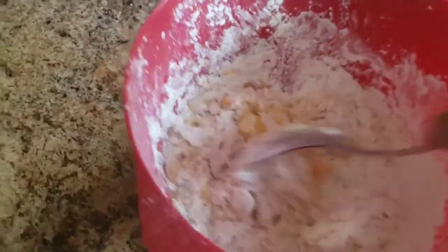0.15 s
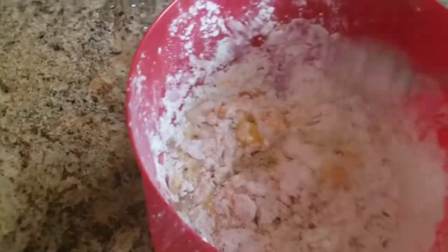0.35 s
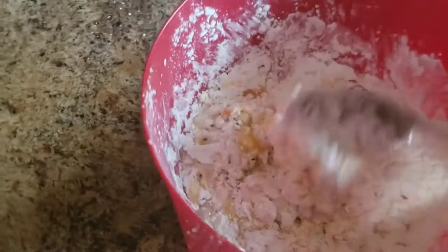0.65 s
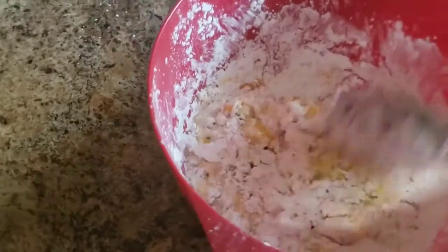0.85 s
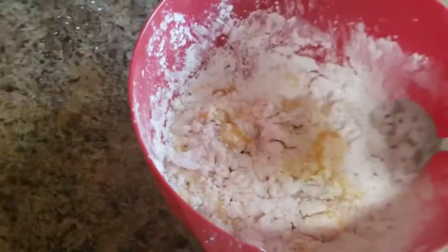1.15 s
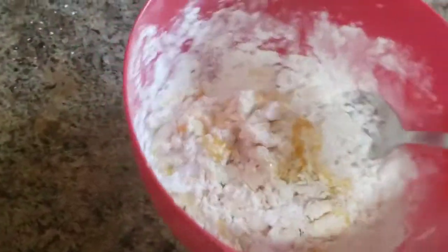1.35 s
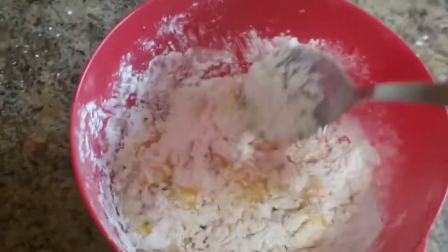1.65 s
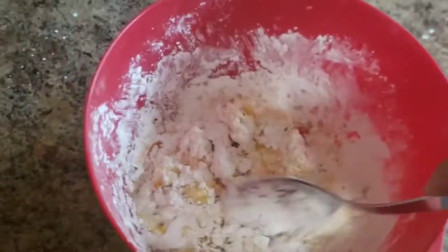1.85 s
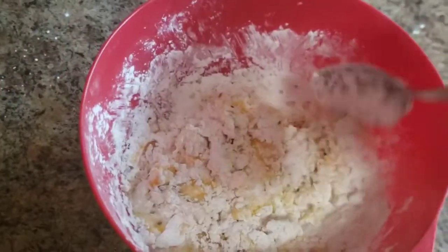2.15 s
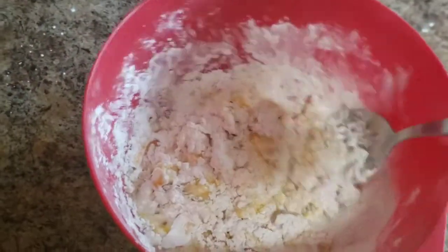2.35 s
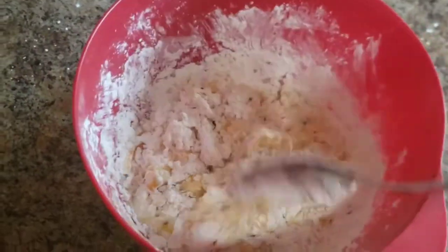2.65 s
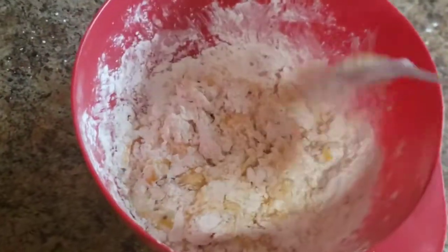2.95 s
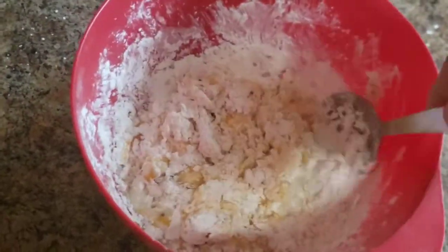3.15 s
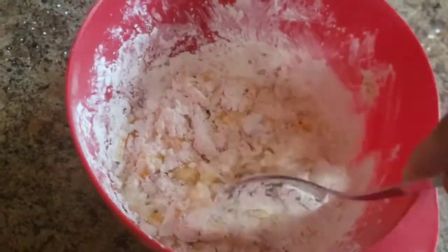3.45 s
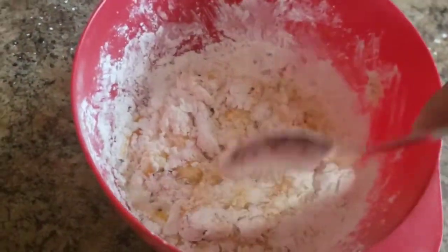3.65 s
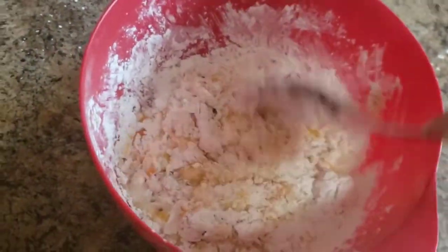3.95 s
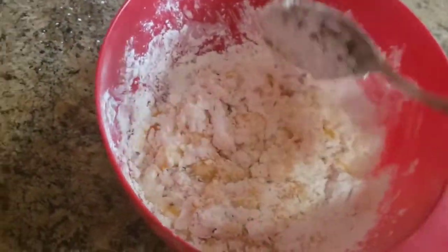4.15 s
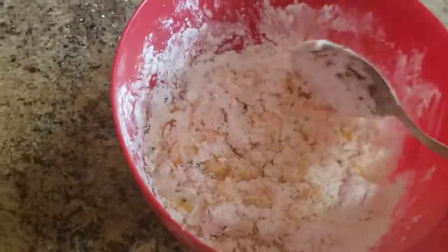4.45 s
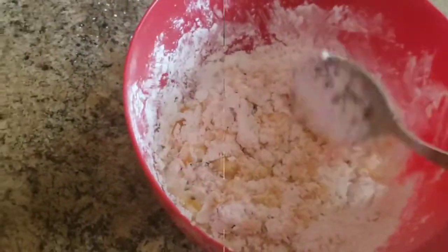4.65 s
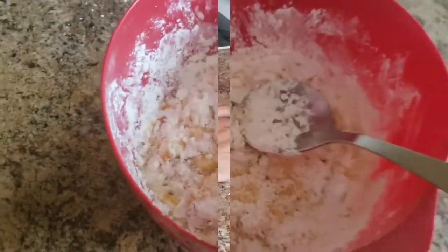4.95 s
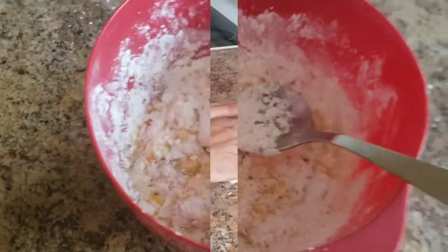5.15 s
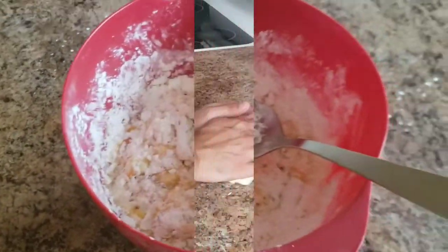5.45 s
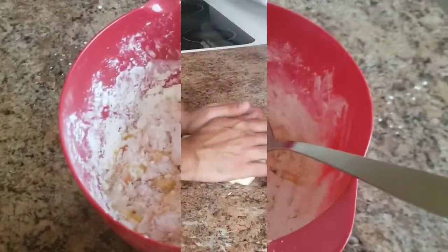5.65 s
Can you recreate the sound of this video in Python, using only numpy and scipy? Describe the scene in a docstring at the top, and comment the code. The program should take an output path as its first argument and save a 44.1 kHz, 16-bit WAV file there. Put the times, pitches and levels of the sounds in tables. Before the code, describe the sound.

Close up in a kitchen, floury dough is stirred with uneven plunges and scrapes, then a spoon raps the rocking plastic bowl.

```python
"""Spoon and dough in a plastic bowl

A metal spoon works crumbly dough in a plastic bowl on a kitchen counter, close to two microphones.
Damped oscillations make the dull plunges, clumped noise the rustle and scraping, short noise the crumbs.
Filtered noise bursts and decaying modes make the knocks, at last five on the bowl, which rocks.
Diffuse echoes of a small hard room answer every blow, over a quiet room tone."""
import sys
import numpy as np
from scipy import signal
from scipy.fft import rfft, irfft, next_fast_len
from scipy.io import wavfile
from scipy.ndimage import map_coordinates

SR = 44100
rng = np.random.default_rng(int(sys.argv[2]) if len(sys.argv) > 2 else 0)


def master_out(mix):
    """Clip the mix to full scale and print it as 16-bit PCM to the path in sys.argv[1]."""
    frames = np.transpose(np.atleast_2d(mix))
    ceiling = np.clip(frames, -1, 1)
    pcm = np.round(ceiling * 32767).astype(np.int16)
    wavfile.write(sys.argv[1], SR, pcm)


N = 256215

# strokes through the mix: (time [s], length [s], flour hiss [dB], wet squish [dB], rub on the wall [dB],
# shaking of the bowl [dB])
STROKES = [(-.02, 0.034, -70.5, -80, -90, -53.5), (0.142, 0.13, -69.5, -69, -80, -49.5),
           (0.605, 0.098, -71.5, -91, -95, -52.5), (0.798, 0.15, -68.5, -74.5, -72, -56.5),
           (1.121, 0.15, -65.5, -64.5, -79, -46.5), (1.27, 0.32, -66.5, -58.5, -67, -59.5),
           (1.55, 0.31, -68.5, -74, -67.5, -58.5), (1.886, 0.22, -68.5, -72.5, -82, -52),
           (2.211, 0.11, -57, -56.5, -61, -44.5), (2.418, 0.13, -66, -64.5, -59, -64),
           (2.565, 0.094, -67.5, -82, -83, -66.5), (2.788, 0.27, -72, -74.5, -63, -41),
           (3.114, 0.099, -58, -63.5, -78, -43), (3.272, 0.059, -67, -66.5, -60.5, -41.5),
           (3.366, 0.093, -68.5, -75, -90.5, -117), (3.539, 0.088, -78, -74.5, -76, -39.5),
           (3.756, .1, -65.5, -68.5, -85, -50), (4.897, 0.12, -75, -69, -86, -43)]
# plunges into the dough: (time [s], pitch [Hz], thud [dB], slap of the base [dB])
THUDS = [(0.167, 124, -40.5, -59.5), (0.466, 115, -47.5, -69), (0.491, 156.4, -30, -32),
         (.854, 111, -49, -57), (1.092, 124, -29, -49), (1.109, 172.2, -28.5, -30),
         (1.314, 133.4, -40, -50.5), (1.586, 158.2, -22, -28), (1.909, 124, -43.5, -59.5),
         (2.189, 144, -38, -53), (2.227, 154.3, -33.5, -44.5), (2.815, 114, -48, -51.5),
         (2.97, 127, -57, -51.5), (3.133, 140.6, -49.5, -77), (3.561, 115, -43.5, -55.5),
         (3.614, 133, -44.5, -63), (3.81, 120.7, -57, -62.5), (4.984, 151.3, -46, -52.5)]
# a hard rap tips the bowl, which rocks on its base:
# (time [s], pitch [Hz], first thud [dB], time between landings [s])
ROCKINGS = [(4.086, 134, -26.5, 0.048), (4.329, 149, -25.5, 0.045), (4.565, 151.6, -33.5, 0.041),
            (4.77, 144.7, -31, 0.044)]
# loudest crumbs breaking and sticky dough letting go: (time [s], smack [dB], tick [dB], length [s])
CRUMBS = [(.187, -50.5, -61, 0.015), (0.27, -61, -58.5, 0.0029), (0.46, -66, -57.5, 0.018),
          (0.477, -49, -61, 0.031), (.7415, -87, -58, 0.00042), (0.755, -71, -55, 0.009),
          (1.048, -66, -54, .0005), (1.086, -56, -56, 0.017), (1.142, -60, -53, 0.011),
          (1.306, -55, -69.5, 0.0046), (1.325, -50, -68, 0.0025), (1.446, -55.5, -71, .003),
          (1.4927, -56, -51, .0005), (1.564, -48, -59.5, 0.017), (1.711, -63.5, -73, 0.0012),
          (1.905, -72, -52.5, 0.0043), (1.965, -58, -54.5, 0.0079), (2.13, -62, -92, 0.011),
          (2.185, -63.5, -64, 0.014), (2.744, -73.5, -51.5, 0.00094), (3.334, -61, -56, .006),
          (3.553, -62.5, -51.5, .005), (3.626, -66, -60.5, 0.0065), (4.96, -80, -61, 0.00089)]
# spoon on the wall: (time [s], clack [dB], edge [dB], fizz before FIZZ_LIFT_DB [dB], nominal skid [s],
# free ring against the crack [dB], pitch of the struck spot [Hz], hollow body [dB])
KNOCKS = [(.489, -35.5, -36.5, -57, 0.0057, -7.5, 3380, -2),
          (.493, -35, -33.5, -53.5, 0.007, -30, 2430, -5), (.503, -36.5, -41.5, -56, 0.005, -15, 1170, 3.5),
          (1.108, -45.5, -74, -77, .0007, -2.5, 663, -1.5),
          (1.589, -42.5, -65.5, -68, .002, -13.5, 800, 3.5), (2.226, -39.5, -47.5, -55, 0.021, -5, 658, -1),
          (2.85, -31.5, -49, -77, .002, -4.5, 1210, -12), (2.971, -43.5, -57, -65, .0087, -5, 1840, -12),
          (4.084, -28.5, -35, -44.5, .0051, -3, 2710, -0.5), (4.268, -59, -71, -84.5, .001, -3.5, 1500, 0),
          (4.329, -25.5, -32, -44.5, .003, -3, 2400, 6), (4.565, -27.5, -38, -52, .0057, -4.5, 2290, 5),
          (4.769, -23, -36, -54, .0014, -7, 2200, 3.5), (4.986, -36.5, -51.5, -67, .0027, -3, 1780, -2)]
# modes of the loaded bowl, before detuning and scatter: (frequency [Hz], level [dB], t60 [s])
BOWL_MODES = [(502, -4, 0.29), (619, 2, 0.16), (687, 0.5, 0.094), (861.5, 0.5, 0.14), (1099, -0.5, 0.17),
              (1175.4, 1.5, 0.18), (1405, 0, 0.075), (1794, -2.5, 0.12), (1990, -5.5, 0.073),
              (2404, 4, 0.02), (2442, 1, 0.04), (2550, -2.5, 0.059), (2850, -8, 0.07)]
# share of the hollow body's level at each frequency: (frequency [Hz], share [1])
HOLLOW_SHARE = [(200, 0), (450, 0.97), (800, 1), (1150, 0.14)]

# relative spectra of the contacts, each: (frequency [Hz], level [dB])
RUMBLE_COLOUR = [(20, -28.5), (35, 0.5), (50, 12.5), (100, -2), (160, 0.5), (240, -17), (500, -31),
                 (1000, -57.5), (4000, -49.5)]  # trembling bowl
SQUISH_COLOUR = [(200, -12), (600, -4.5), (1200, -7), (1900, -0.5), (3200, -1), (4500, -5.5), (7000, -17),
                 (8500, -37), (16000, -28.5)]  # wet dough
FIZZ_COLOUR = [(3000, -19.5), (6000, 4), (7300, 3), (8400, -15), (9800, -7), (11500, -0.5), (15500, -1.5)]  # dry flour
DOUGH_COLOUR = [(100, -14), (220, 11), (500, -8), (800, -13), (1200, -13), (2500, -29.5), (6000, -48)]  # packed dough on the wall
BOOM_COLOUR = [(20, -41.5), (35, -29.5), (47, 5), (80, 0.5), (100, -1), (130, -17.5), (250, -36),
               (800, -69)]  # counter
SLAP_COLOUR = [(80, -14.5), (240, -1.5), (380, 0), (540, -6.5), (750, -12), (1100, -21), (2500, -35),
               (6000, -74.5)]  # base of the bowl
SMACK_COLOUR = [(600, -3.5), (1700, -8.5), (3000, 0.5), (4200, -3.5), (8000, -43)]  # parting wet dough
SNAP_COLOUR = [(3000, -25.5), (5500, 2.5), (7000, 6), (8400, -14), (10000, -8.5), (13000, -2),
               (15500, -3.5)]  # breaking crumbs
CLACK_COLOUR = [(200, -44.5), (480, -13.5), (630, 4), (1000, -5), (1170, 1.5), (1400, -9), (2000, 0),
                (2450, -3.5), (3000, -11.5), (4000, -20.5), (7000, -54)]  # struck plastic
EDGE_COLOUR = [(1500, -24), (3400, 1.5), (4500, -8), (5500, -5), (7200, -11), (8300, -27.5), (11000, -43)]  # steel edge

# relative spectrum of the room tone: (frequency [Hz], level [dB])
TONE_COLOUR = [(15, -29), (25, -11), (56, 4), (145, -10), (560, -29.5), (1070, -29), (1230, -26.5),
               (1400, -33), (1940, -28.5), (2410, -17), (3250, -34), (6210, -30), (9070, -43), (16000, -36)]
# level difference between microphones, before the share: (frequency [Hz], left over right [dB])
LEFT_OVER_RIGHT = [(50, 3.5), (200, 1), (600, 3), (1200, 7), (2200, 11), (4500, 17), (15000, 15.5)]
# reverberation time: (frequency [Hz], t60 [s])
ROOM_DECAY = [(60, 0.17), (150, 0.37), (600, 0.36), (2000, 0.33), (6000, 0.29), (13000, 0.19)]
# relative spectrum of the echoes: (frequency [Hz], level [dB])
ROOM_LEVEL = [(50, -5.5), (150, -2), (300, -7), (700, -4), (2000, -8), (6000, -9), (13000, -7)]

TOP_HZ = 16100
T = np.arange(SR // 2) / SR  # time within one blow [s]
ATTACK = int(.035 * SR)  # samples at the start of a blow over which its level is set
STROKE_RISE_S, STROKE_FALL_DB_PER_S = 0.039, 223
# the hand keeps the bowl trembling and flour trickling until it rests
HOLD_END_S, HOLD_SHAKE_DB, HOLD_FLOUR_DB = 5.0, -67.5, -78.5
# small crumbs: mean rate, level against the stroke, scatter of that level
CRUMBLE_PER_S, CRUMBLE_DB, CRUMBLE_SPREAD_DB = 20, -4, 3.5
# the counter's boom under a thud of BOOM_AT_DB, and dB more per dB of thud
BOOM_DB, BOOM_AT_DB, BOOM_GROWS = -32, -27.5, 0.82
# loss per landing; first slap against its thud; the slap's extra loss per landing
ROCK_LOSS_DB, ROCK_SLAP_DB, ROCK_SOFTENS_DB = 1.5, -8.5, 2
# the edge's treble tilts above BITE_HZ: fizz of a bare edge; dB per octave for each dB more fizz
BITE_HZ, BARE_FIZZ_DB, BITE_GROWS = 3400, -12.5, .6
# a longer skid is duller: dB per octave for each doubling
BRIEF_SKID_S, SKID_DULLS_DB = 0.0033, 2
FIZZ_LIFT_DB = 4.0


def amp(db):
    """Level law: decibels to amplitude ratio."""
    return 10 ** (np.asarray(db) / 20)


def unit(x):
    """Normalisation: scale to rms 1."""
    return x / np.sqrt(np.mean(x ** 2) + 1e-20)


def along(points, hz):
    """Interpolation of (frequency, value) points on a logarithmic frequency axis."""
    f, v = np.transpose(points)
    return np.interp(np.log(hz + 1), np.log(f + 1), v)


def filtered(x, response):
    """Linear filtering: multiply the spectrum by a response of frequency."""
    size = next_fast_len(N + SR // 2)
    hz = np.fft.rfftfreq(size, 1 / SR)
    return irfft(rfft(x, size) * response(hz), size)[..., :N]


def causal(points, size=8192):
    """Minimum phase: folding the cepstrum gives the earliest impulse response of a given colour."""
    level_db = along(points, np.fft.rfftfreq(size, 1 / SR))
    cepstrum = irfft(np.log(amp(level_db)))
    cepstrum[1:size // 2] *= 2
    cepstrum[size // 2 + 1:] = 0
    return irfft(np.exp(rfft(cepstrum)))


def through(x, response):
    """Convolution with an impulse response, keeping the length of x."""
    return signal.fftconvolve(np.atleast_2d(x), np.atleast_2d(response), axes=1)[:, :x.shape[-1]]


def at_level(x, db, size=ATTACK):
    """Onset level: set the rms of a blow's first moments, averaged over the microphones."""
    onset = x.mean(0)[:size]
    return amp(db) * x / np.sqrt(np.mean(onset ** 2) + 1e-20)


def pair(apart, size):
    """Partial coherence: noise at two microphones with a common part and a part of their own."""
    common = rng.standard_normal(size)
    return unit(common + apart * rng.standard_normal((2, size)))


def impact(x, spike):
    """Impulsive contact: vibration of unit energy, with a single spike at its first sample."""
    x /= np.linalg.norm(x[0])
    x[:, 0] += spike
    return x


def burst(t60, spike, apart):
    """Exponential decay: a sharp contact followed by dense, quickly dying vibration."""
    return impact(pair(apart, len(T)) * amp(-60 * T / t60), spike)


def skidding(t60, skid, spike, apart, grit_db):
    """Stick-slip: uneven slips keep the dense vibration up, and a long skid softens the first contact."""
    slip_noise = rng.standard_normal(len(T) // 50 + 4)
    slips = amp(grit_db * map_coordinates(slip_noise, [np.arange(len(T)) / 50]))
    vibration = pair(apart, len(T)) * slips * amp(-60 * T / (t60 + 7 * skid))
    return impact(vibration, spike * np.exp(-skid / 0.021))


def add(track, s, x):
    """Superposition: mix a sound in at time s, or at the start if s is negative."""
    start = max(round(s * SR), 0)
    track[:, start:start + x.shape[-1]] += x[:, :max(N - start, 0)]


def room_tone():
    """Stationary noise: steady and coloured, partly coherent between the microphones."""
    return unit(filtered(pair(0.9, N), lambda hz: amp(along(TONE_COLOUR, hz))))


def stroke(start, length):
    """Envelope of a driving force: the spoon bites in, pushes evenly and lets go."""
    t = np.arange(N) / SR - start
    release = amp(-STROKE_FALL_DB_PER_S * np.maximum(t - length, 0))
    return np.clip(t / STROKE_RISE_S, 0, 1) * release


def effort():
    """Power addition: gains of hiss, squish, rub and shaking over all strokes."""
    power = sum(np.outer(amp(levels), stroke(s, length)) ** 2 for s, length, *levels in STROKES)
    return np.sqrt(power)


def wobble(rate_hz):
    """Random modulation: smoothly interpolated noise with rate_hz independent values a second."""
    values = rng.standard_normal(int(N * rate_hz / SR) + 4)
    return map_coordinates(values, [np.arange(N) * rate_hz / SR])


def grains(colour, clump_hz, clump_db, apart):
    """Granular friction: particles give way in clumps, inside slower surges; rms 1."""
    clumps = np.clip(wobble(clump_hz), -2, 2.5)
    surges = .35 * wobble(clump_hz / 8)
    return unit(through(pair(apart, N) * amp(clump_db * (clumps + surges)), causal(colour)))


def crumble(gain, colour, size=350):
    """Poisson-like fracture: small crumbs give way at random moments, scaled by the stroke's gain."""
    chance, scatter = rng.random(N), rng.standard_normal(N)
    sizes = amp(CRUMBLE_DB + CRUMBLE_SPREAD_DB * np.clip(scatter, -2, 2))
    breaks = (chance < CRUMBLE_PER_S / SR) * gain * sizes
    snap = through(burst(t60=.012, spike=1.5, apart=0.58), causal(colour))
    return through(breaks, at_level(snap, 0, size))


def stirring():
    """Friction noise: a stroke sifts flour, kneads wet dough, rubs dough on plastic and shakes the bowl."""
    hiss, wet, rub, shake = effort()
    held = stroke(0, HOLD_END_S)
    # the hand's steady share adds to the strokes in power
    trembling = np.hypot(shake, amp(HOLD_SHAKE_DB) * held)
    trickling = np.hypot(hiss, amp(HOLD_FLOUR_DB) * held)
    rumble = trembling * grains(RUMBLE_COLOUR, clump_hz=42.86, clump_db=3.0, apart=0.035)
    squish = wet * grains(SQUISH_COLOUR, clump_hz=276, clump_db=3.5, apart=0.98)
    flour = trickling * grains(FIZZ_COLOUR, clump_hz=620, clump_db=2.5, apart=.7)
    drag = rub * grains(DOUGH_COLOUR, clump_hz=109, clump_db=4, apart=.3)
    small_crumbs = crumble(wet, SMACK_COLOUR) + crumble(hiss, SNAP_COLOUR)
    return rumble + squish + flour + drag + small_crumbs


def landings(count=3):
    """Energy loss in rocking: a tipped bowl lands ever weaker and softer; rows like those of THUDS."""
    rows = []
    for s, hz, thud_db, gap in ROCKINGS:
        for k in range(count):
            slap_db = thud_db + ROCK_SLAP_DB - k * (ROCK_LOSS_DB + ROCK_SOFTENS_DB)
            rows.append((s + k * gap, hz, thud_db - k * ROCK_LOSS_DB, slap_db))
    return rows


def swing(hz, swell_s):
    """Damped oscillation: a sine that swells until swell_s and then dies away."""
    return (T * np.exp(-T / swell_s) * np.sin(2 * np.pi * hz * T))[None]


def thuds(rise_s=0.0055, overtone=1.56, base_rise_s=0.0071, base_db=-2):
    """Mass on a soft spring: blows swing the bowl a few cycles, slap its base and boom in the counter."""
    out = np.zeros((2, N))
    boom, slap = causal(BOOM_COLOUR), causal(SLAP_COLOUR)
    for s, hz, thud_db, slap_db in THUDS + landings():
        add(out, s, at_level(swing(hz, rise_s), thud_db))
        boom_db = BOOM_DB + BOOM_GROWS * (thud_db - BOOM_AT_DB)
        add(out, s, at_level(through(burst(t60=0.12, spike=0.59, apart=0.2), boom), boom_db))
        soft_burst = burst(t60=0.11, spike=0, apart=0.23) * (1 - np.exp(-T / 0.0019))
        squash = at_level(through(soft_burst, slap), 0)
        base = at_level(swing(overtone * hz, base_rise_s), base_db)
        add(out, s, at_level(squash + base, slap_db))
    return out


def crumbs(size=350):
    """Brittle fracture and adhesion: crumbs snap singly or in gritty runs; wet dough parts with a smack."""
    out = np.zeros((2, N))
    smack, snap = causal(SMACK_COLOUR), causal(SNAP_COLOUR)
    for s, smack_db, tick_db, length in CRUMBS:
        parting = skidding(t60=0.022, skid=length, spike=0.34, apart=0.23, grit_db=8.0)
        add(out, s, at_level(through(parting, smack), smack_db, size))
        breaking = skidding(t60=0.019, skid=length, spike=1.1, apart=1.0, grit_db=4)
        add(out, s, at_level(through(breaking, snap), tick_db, size))
    return out


def favour(hz, spot_hz, body_db, slope_db=4, peak_db=6, octaves=0.094):
    """Selective excitation: a struck spot favours its own pitch and stirs the hollow body, in dB."""
    distance = np.abs(np.log2(hz / spot_hz))
    peak = peak_db * np.exp(-(distance / octaves) ** 2)
    return peak - slope_db * distance + body_db * along(HOLLOW_SHARE, hz)


def edge_colour(edge_db, fizz_db, skid):
    """Contact damping: flour under the edge dulls its bite along with its fizz, and so does a long skid."""
    flour_tilt = BITE_GROWS * (fizz_db - edge_db - BARE_FIZZ_DB)
    tilt = flour_tilt - SKID_DULLS_DB * np.log2(skid / BRIEF_SKID_S)
    return causal([(f, db + tilt * max(np.log2(f / BITE_HZ), 0)) for f, db in EDGE_COLOUR])


def wall_ring(spot_hz, body_db):
    """Modal superposition: the plastic wall rings as a sum of decaying sines."""
    hz, mode_db, t60 = np.transpose(BOWL_MODES)[:, :, None]
    # every mode reaches the two microphones with its own strength and phase
    scatter_db = rng.normal(0, 5.1, (2, *hz.shape))
    strength = amp(mode_db + favour(hz, spot_hz, body_db) + scatter_db)
    phase = rng.uniform(0, 2 * np.pi, hz.shape) + rng.normal(0, 0.67, strength.shape)
    tuning = 1 + rng.normal(0, 0.0094, hz.shape)  # the shifting dough detunes the wall
    modes = strength * amp(-60 * T / t60) * np.sin(2 * np.pi * hz * tuning * T + phase)
    return modes.sum(1) * (1 - np.exp(-T / 0.0011))


def knocks(brush_db=-21, lead_s=.005):
    """Impact excitation: the spoon brushes the flour, hits and skids; the wall cracks and rings."""
    out = np.zeros((2, N))
    fizz = causal(FIZZ_COLOUR)
    for s, clack_db, edge_db, fizz_db, skid, free_db, spot_hz, body_db in KNOCKS:
        ring = at_level(wall_ring(spot_hz, body_db), free_db)
        clack = causal([(f, db + favour(f, spot_hz, body_db)) for f, db in CLACK_COLOUR])
        hit = skidding(t60=0.049, skid=skid, spike=0.59, apart=0.35, grit_db=-1.5)
        crack = at_level(through(hit, clack), 0)
        add(out, s, at_level(ring + crack, clack_db))
        # the steel edge bites, and flour sprays from under it
        edge = edge_colour(edge_db, fizz_db, skid)
        bite = skidding(t60=0.02, skid=0.44 * skid, spike=0.51, apart=0.64, grit_db=5.5)
        add(out, s, at_level(through(bite, edge), edge_db))
        spray = skidding(t60=0.017, skid=.8 * skid, spike=0.75, apart=2.5, grit_db=-2.5)
        add(out, s, at_level(through(spray, fizz), fizz_db + FIZZ_LIFT_DB))
        brush = through(burst(t60=0.081, spike=0, apart=.8), edge)
        add(out, s - lead_s, at_level(brush, edge_db + brush_db))
    return out


def echo_tail():
    """Diffuse decay: noise dies at each frequency's own rate, alike at both microphones in the bass."""
    hz, t, z = signal.stft(rng.standard_normal((2, SR * 3 // 4)), SR, nperseg=512)
    t60 = along(ROOM_DECAY, hz)[:, None]
    width = np.minimum(hz / 900, 1)[:, None]
    z = np.array([z[0] + width * z[1], z[0] - width * z[1]])
    # the root evens out the energy of long and short decays
    decay = amp(-60 * t / t60) * np.sqrt(2 * np.log(1000) / (t60 * SR))
    colour = amp(along(ROOM_LEVEL, hz))[:, None]
    tail = signal.istft(z * decay * colour, SR, nperseg=512)[1]
    return tail * (1 - np.exp(-np.arange(tail.shape[1]) / SR / 0.0027))


def kitchen(x, count=14):
    """Reverberation by convolution: the echo pattern shifts as spoon and bowl move."""
    out = np.zeros((2, N))
    edges = np.linspace(0, N, count + 1).astype(int)
    for start, end in zip(edges, edges[1:]):
        add(out, start / SR, signal.fftconvolve(x[:, start:end], echo_tail(), axes=1))
    return out


def sideways(x, share, lag):
    """Interaural-style cues: a frequency-dependent level ratio, and the left lag seconds after the right."""
    def response(hz):
        ratio = amp(share * along(LEFT_OVER_RIGHT, hz))
        return 2 * np.array([ratio, np.exp(2j * np.pi * hz * lag)]) / (1 + ratio)
    return filtered(x, response)


def scene():
    """Superposition of direct sound from the wall and inside the bowl, its echoes and the room tone."""
    inside = stirring() + thuds() + crumbs()
    wall = knocks()
    near = sideways(wall, share=0.67, lag=.00007) + sideways(inside, share=1.0, lag=.00008)
    echoes = sideways(amp(-0.5) * kitchen(wall + inside), share=0.57, lag=.00008)
    return near + echoes + amp(-69.5) * room_tone()


def record(dry):
    """Band limitation: a very steep low-pass at TOP_HZ."""
    return filtered(dry, lambda hz: 1 / (1 + (hz / TOP_HZ) ** 120))


dry = scene()
out = record(dry)
master_out(out)
```